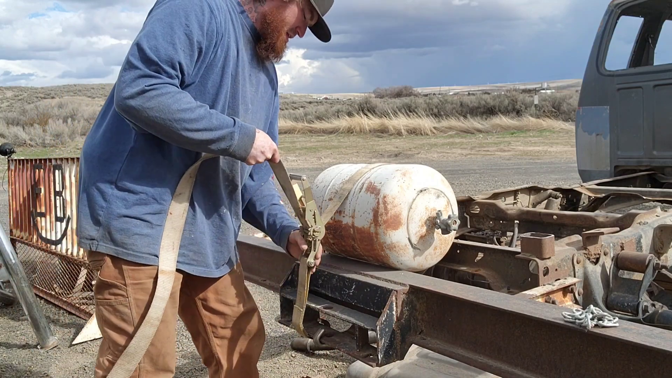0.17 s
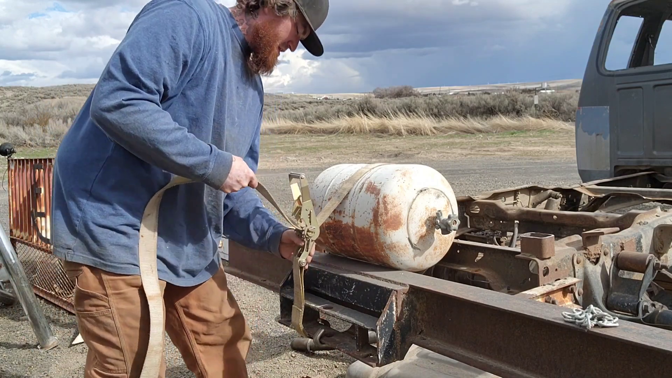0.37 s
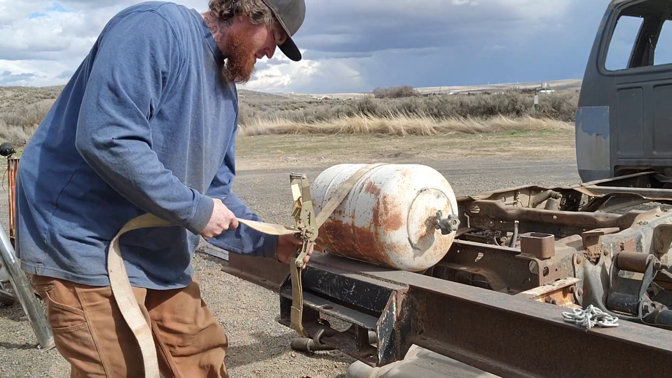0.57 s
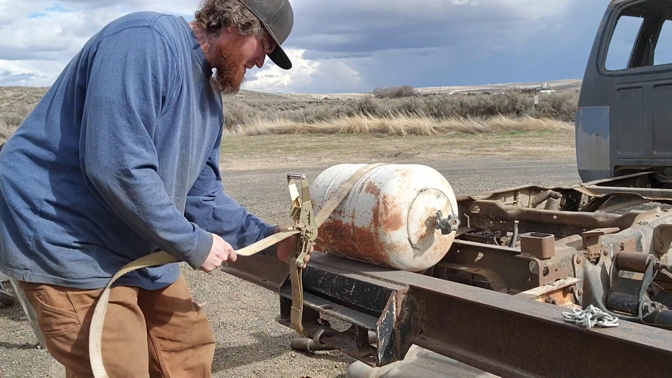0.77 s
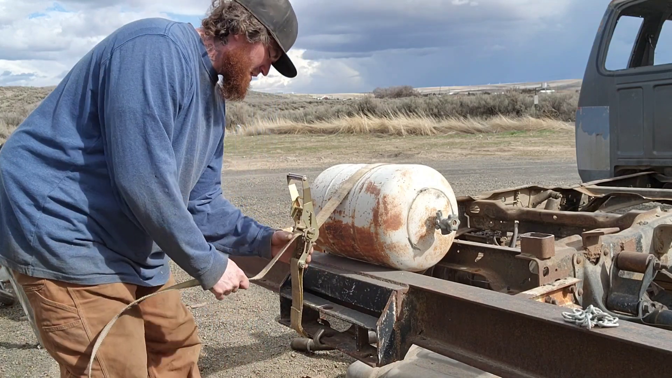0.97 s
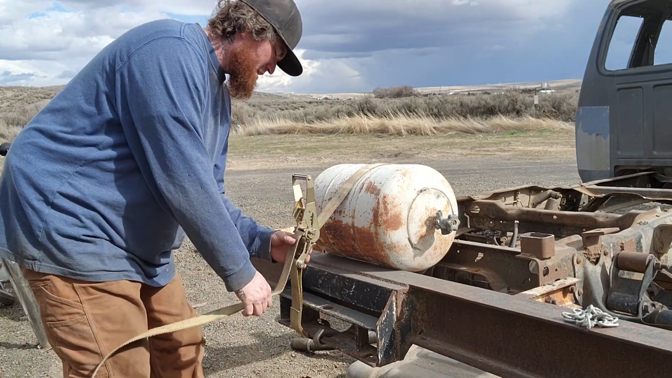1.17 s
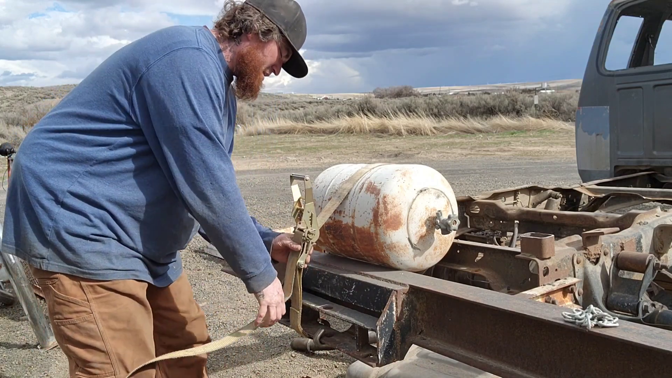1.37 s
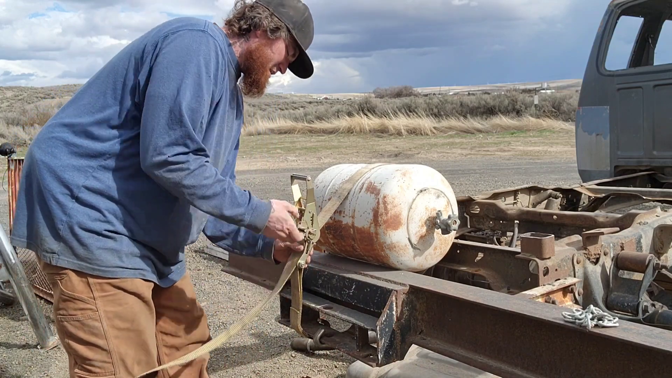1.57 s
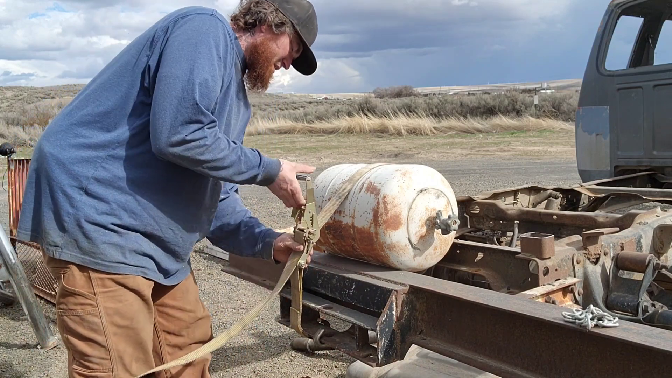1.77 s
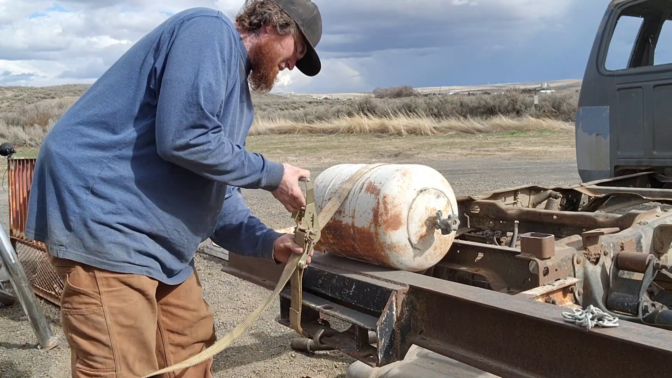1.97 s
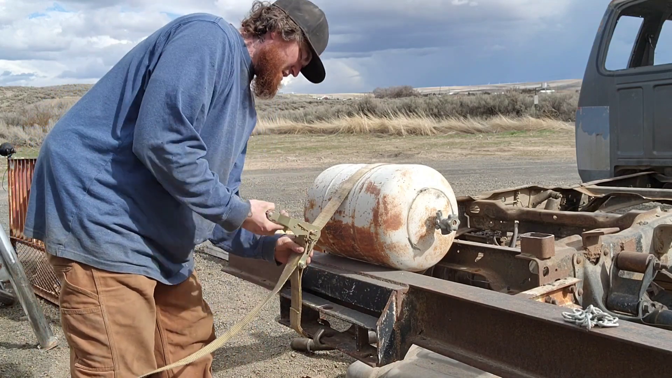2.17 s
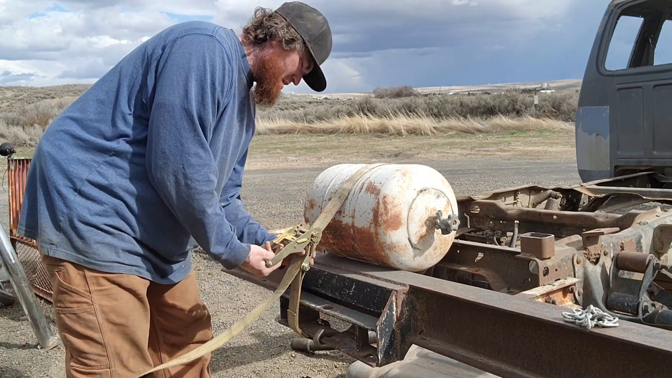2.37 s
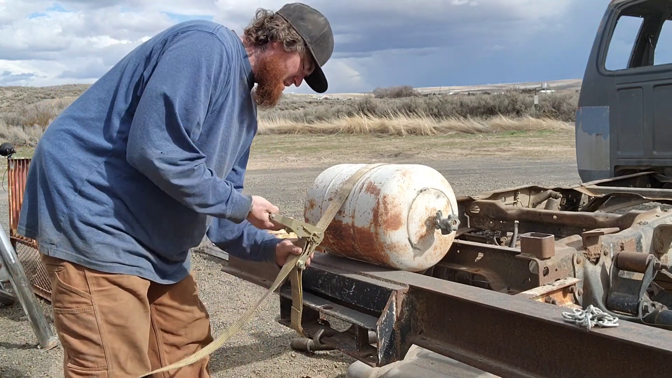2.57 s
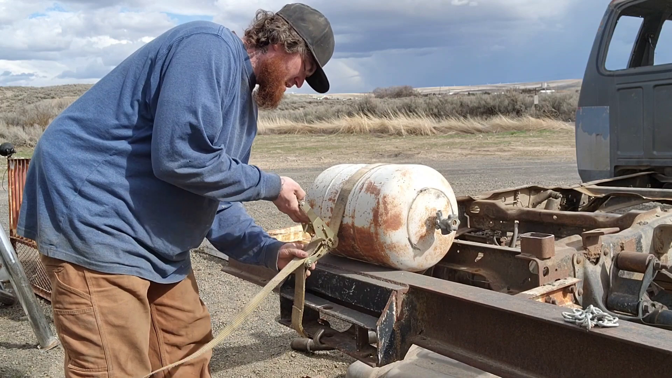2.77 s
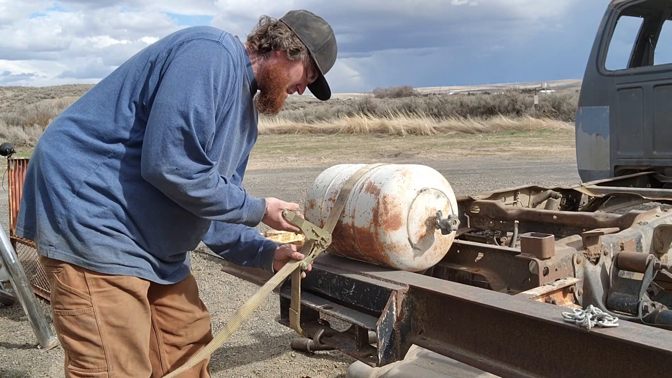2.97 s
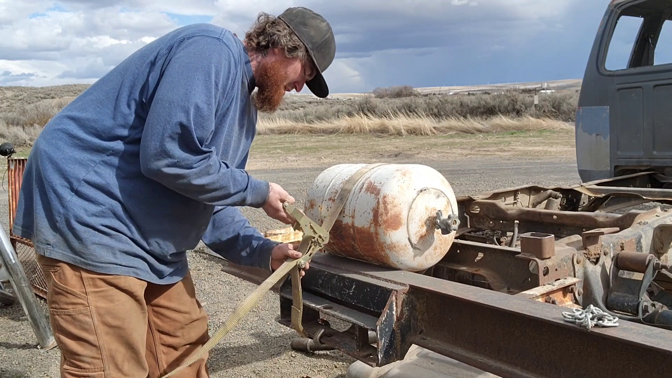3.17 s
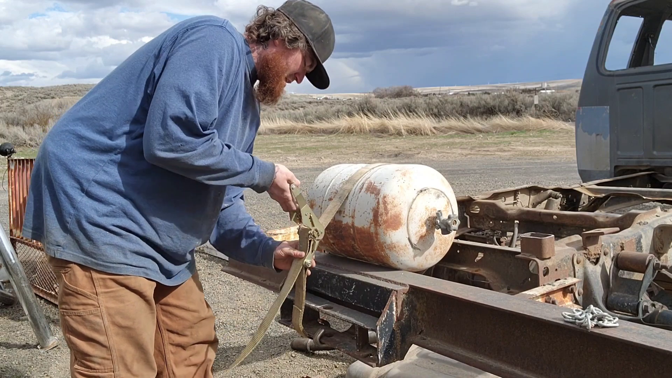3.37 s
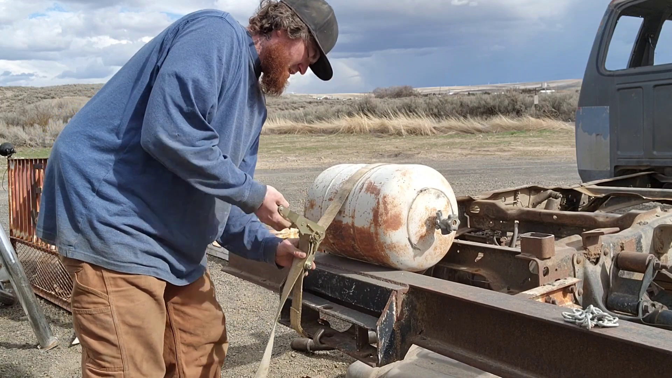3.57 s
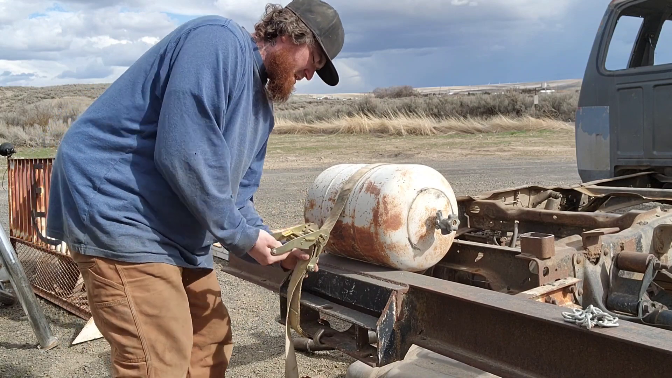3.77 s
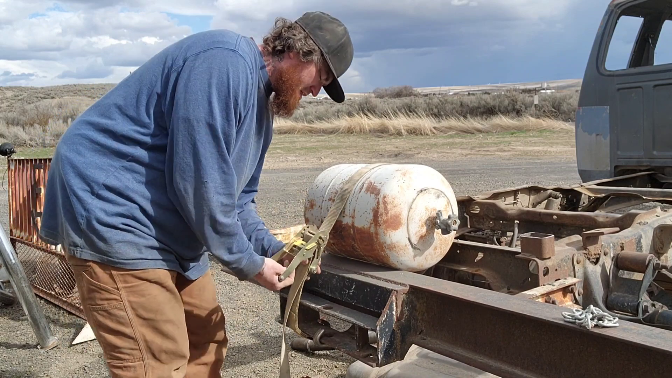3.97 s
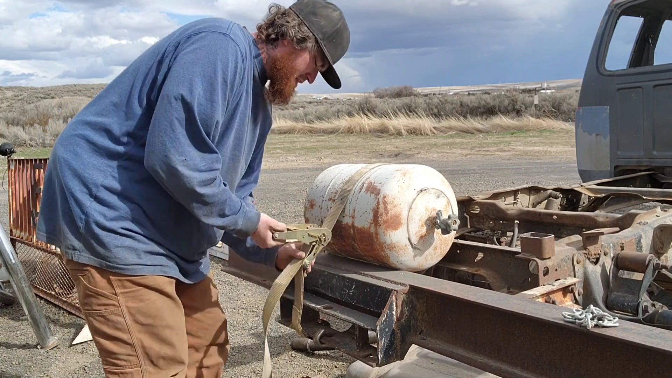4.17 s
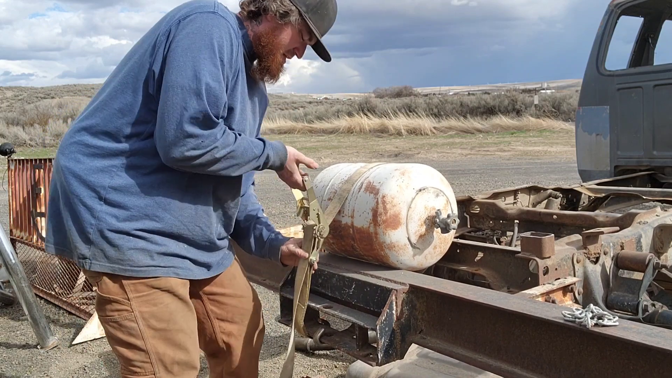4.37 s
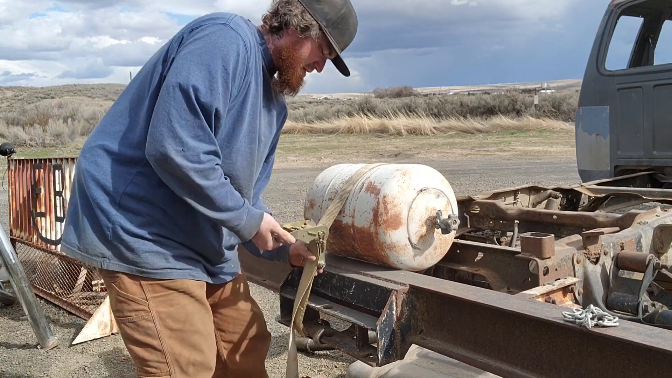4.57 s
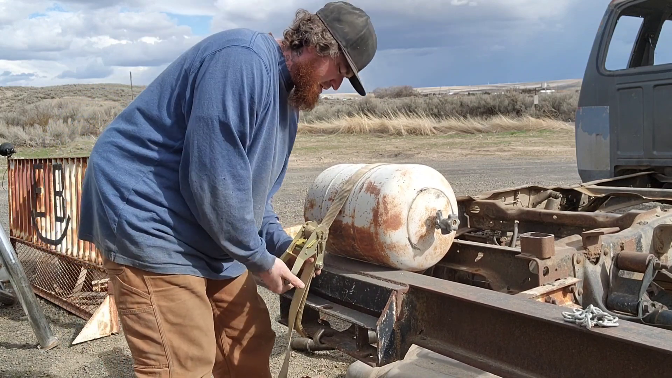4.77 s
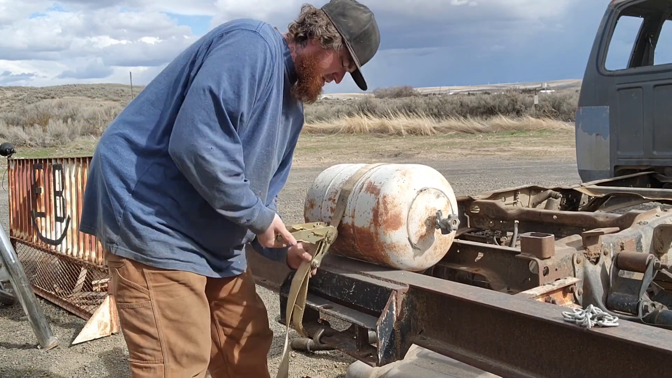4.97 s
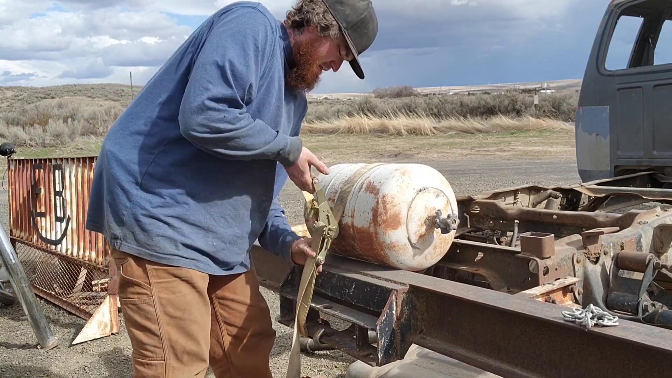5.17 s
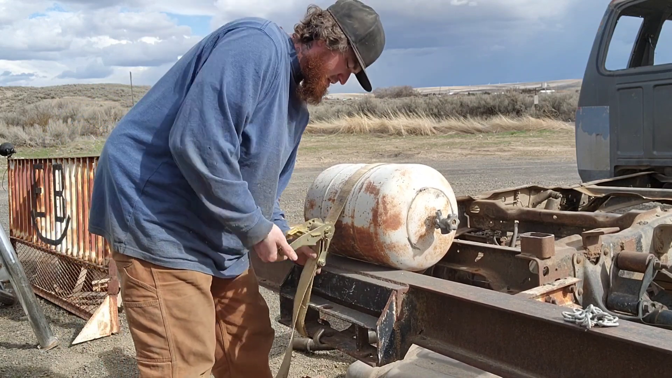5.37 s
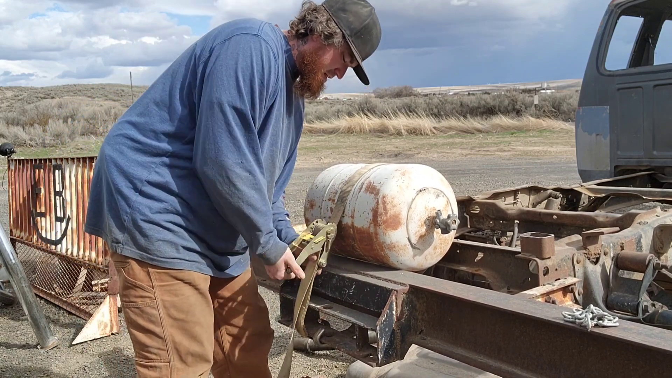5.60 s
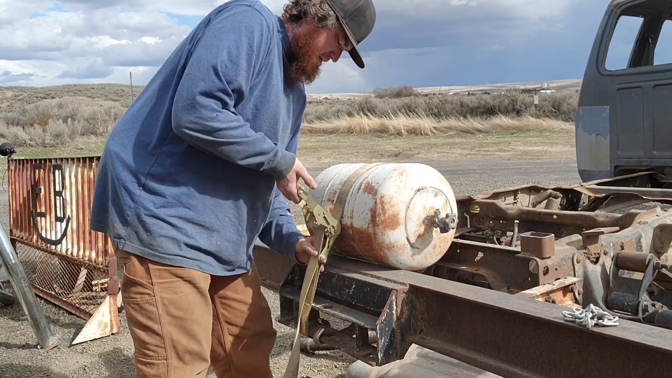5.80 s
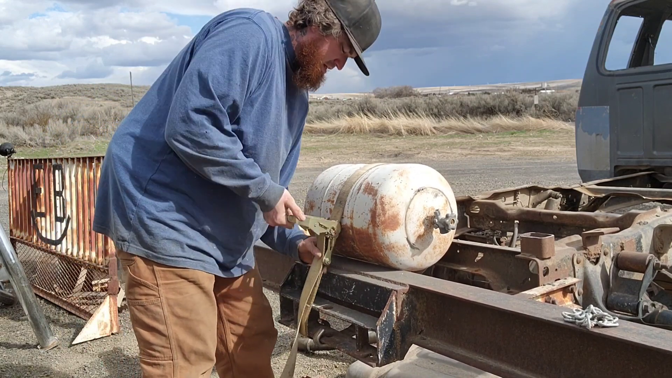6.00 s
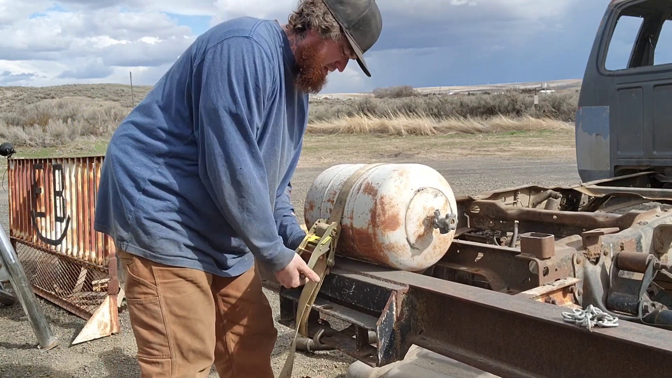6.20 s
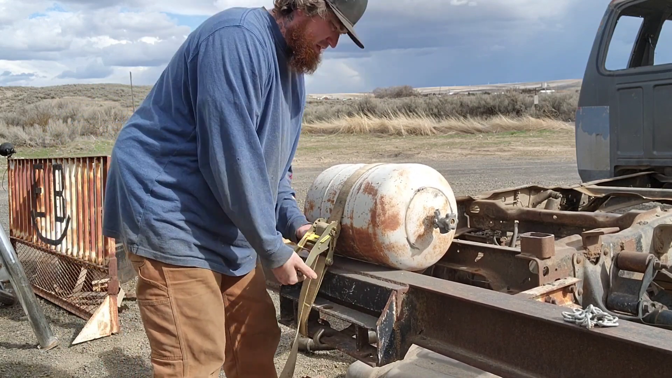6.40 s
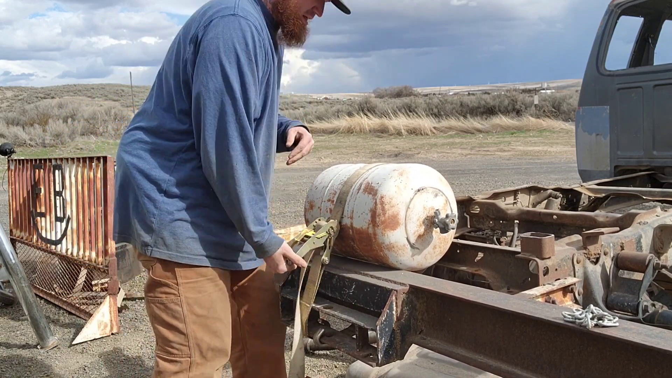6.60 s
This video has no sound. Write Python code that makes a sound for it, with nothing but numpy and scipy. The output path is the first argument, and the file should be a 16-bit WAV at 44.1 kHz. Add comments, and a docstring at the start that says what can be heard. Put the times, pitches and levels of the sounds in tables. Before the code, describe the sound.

Close metal ratchet snaps, sparse then rapid, with rattles, thumps on a tank, webbing hiss and squeaks over low wind rumble.

```python
"""Out in the open over a steel tank, close to two microphone ports: a webbing strap is ratcheted tight.
Wind rumble and faint air lie under it all; a scrape, scuffs and soft knocks on tank and beam come first,
shaped from noise and decaying modes. Near 1 s a faint pawl snap and the swish of the loose strap end follow.
Hard snaps start after 2 s and crowd from 3 to 6 s, each a blow with a rattle on ringing steel; the pivot,
a gliding tone, squeaks around 5 to 5.8 s. Webbing hisses in grains; scuffs and wind remain at the end."""
import sys
import numpy as np
from scipy import signal
from scipy.fft import rfft, irfft
from scipy.io import wavfile

SR = 44100
rng = np.random.default_rng(int(sys.argv[2]) if len(sys.argv) > 2 else 0)


def put_to_file(sound):
    """Save the sound as 16-bit audio at rate SR, in the file named by the first command-line argument."""
    columns = np.atleast_2d(sound).T  # one column per channel
    safe = np.clip(columns, -1, 1)
    whole_steps = np.round(safe * 32767)
    wavfile.write(sys.argv[1], SR, whole_steps.astype(np.int16))


N = 292824
HZ = np.maximum(np.fft.rfftfreq(N, 1 / SR), 1)
FRAME, EARLY = 2 ** 14, 2 ** 12   # samples for one blow, and before its snap
T_BLOW, HZ_BLOW = (np.arange(FRAME) - EARLY) / SR, np.fft.rfftfreq(FRAME, 1 / SR)


def from_db(db):
    """Gain of a level."""
    return 10 ** (np.asarray(db) / 20)


def rms_one(x):
    """Scaled to unit rms."""
    return x / np.sqrt(np.mean(x ** 2) + 1e-20)


def in_time(rows):
    """Columns joined by straight lines, one value a sample."""
    s, *columns = np.transpose(rows)
    return [np.interp(np.arange(N) / SR, s, column) for column in columns]


def at_hz(points, hz=HZ):
    """A (f/Hz, value) table read on a log-frequency axis."""
    point_hz, value = np.transpose(points)
    return np.interp(np.log(hz), np.log(point_hz), value)


def drift(rate_hz):
    """Slow random wander of rms 1, low-passed around rate_hz."""
    slow = irfft(rfft(rng.standard_normal(N)) / (1 + (HZ / rate_hz) ** 2), N)
    return rms_one(slow)


def grains(per_s, spread_db):
    """Sparse clicks of uneven size and either sign, in two channels; rms 1."""
    sizes = from_db(spread_db * np.minimum(rng.exponential(1, (2, N)), 4))
    signs = rng.choice([-1, 1], (2, N))
    present = rng.random((2, N)) < per_s / SR
    return rms_one(sizes * signs * present)


# likeness of left and right in diffuse sounds: (f/Hz, likeness from 0 to 1)
LIKENESS = [(60, 0.98), (180, 0.95), (550, 0.18), (1650, 0.38), (4970, 0.15), (15000, 0.25)]


def diffuse(pair, spectrum):
    """Two noises become left and right of the given colour and likeness; rms 1."""
    mid, side = rfft(pair)
    alike = np.clip(at_hz(LIKENESS), 0, 1)
    both = np.sqrt(1 + alike) * mid + np.sqrt(1 - alike) * side * [[1], [-1]]
    return rms_one(irfft(both * from_db(at_hz(spectrum)), N))


def body(modes, scatter_db, turn_per_khz):
    """Response at two ports to one blow: new strengths each time, each mode at its own phase per port."""
    hz, level_db, t60 = np.transpose(modes)[:, :, None]
    decay_per_s = np.log(1000) / t60
    resonance = SR / 2 / (decay_per_s + 2j * np.pi * (HZ_BLOW - hz))

    def struck():
        """Left and right spectra of one blow."""
        luck = rng.standard_normal((3, len(modes)))
        turn = np.minimum(turn_per_khz * hz.T / 1000, np.pi) * luck[1:]
        strength = from_db(level_db.T + scatter_db * luck[0])
        return (strength * np.exp(1j * turn) * -1j) @ resonance
    return struck


def near(centre_hz, fall_db_per_octave):
    """Level in dB, falling evenly per octave to both sides of a centre."""
    return -fall_db_per_octave * np.abs(np.log2((HZ_BLOW + 1) / centre_hz))


def add(out, s, spectrum):
    """One blow is laid into a track that starts early."""
    start = round(s * SR)
    out[:, start:start + FRAME] += irfft(spectrum, FRAME)


# wind strength: (t/s, level/dB)
GUSTS = [(0.0, -51), (3.55, -49.5), (4.46, -47), (6.64, -47)]
# colour of the wind rumble: (f/Hz, relative level/dB per Hz)
WIND = [(12, -25), (20, -7), (59, 2), (87, 0.5), (135, -7), (190, -6), (500, -32), (650, -62.5),
        (1100, -120)]
# colour of the open country: (f/Hz, relative level/dB per Hz)
AIR = [(180, -32.5), (300, 0), (942, -20), (2110, -13.5), (2960, -29.5), (7350, -23.5), (10000, -47),
       (13000, -77.5), (22000, -120)]


def weather():
    """Low wind rumble, wandering in level, over the faint wide noise of open country."""
    [wind_db] = in_time(GUSTS)
    wind = diffuse(rng.standard_normal((2, N)), WIND) * from_db(wind_db + 1.4 * drift(0.57))
    air = from_db(-68.5) * diffuse(rng.standard_normal((2, N)), AIR)
    return wind + air


# colour of the loose strap end: (f/Hz, relative level/dB per Hz)
BRUSH = [(2500, -40), (4000, -10), (5600, 0), (7000, -5), (9500, -28), (13000, -8), (16000, -18)]


def brush(start_s, length_s, level_db):
    """The loose strap end brushes past: one short swish of noise, quick to rise and slower to fade."""
    gone = np.clip((np.arange(N) / SR - start_s) / length_s, 0, 1)
    swish = np.sin(np.pi * np.sqrt(gone))
    return from_db(level_db) * swish * diffuse(rng.standard_normal((2, N)), BRUSH)


# movements of hands, strap and feet: (t/s, hold/s, webbing hiss level/dB, scuffing level/dB)
MOVES = [(0, 0.013, -60.5, -58.5), (0.2, 0.055, -64.5, -53.5), (0.548, 0.2, -65.5, -59),
         (0.698, 0.065, -51.5, -50), (0.735, 0.0077, -53, -47), (0.82, 0.015, -59, -69),
         (0.958, 0.041, -60, -63.5), (1.25, 0.18, -74.5, -73), (1.762, 0.1, -80.5, -67),
         (2.138, 0.045, -63, -74.5), (2.318, 0.074, -77, -70), (2.52, 0.014, -62, -65),
         (2.69, 0.015, -67, -79), (3.265, 0.032, -69, -55), (3.543, 0.026, -64, -62.5),
         (3.67, 0.065, -66, -58), (3.966, 0.037, -69.5, -57), (4.181, 0.13, -60, -59.5),
         (4.498, 0.14, -70, -53), (4.674, 0.023, -66, -71), (5.092, 0.09, -78.5, -59.5),
         (5.296, 0.091, -79, -59), (5.759, 0.014, -55.5, -49.5), (6.384, 0.13, -71.5, -59),
         (6.562, 0.082, -75.5, -58)]
SWELL_DB_PER_S, FADE_DB_PER_S = 217, 148
REST_HISS_DB, REST_SCUFF_DB = -77, -74   # floor beneath the movements


def strokes():
    """Each movement swells, holds and fades; hiss and scuffing levels in dB."""
    s, hold, *levels_db = np.transpose(MOVES)[:, :, None]
    t = np.arange(0, N + 64, 64) / SR
    swell_db = -SWELL_DB_PER_S * np.maximum(s - t, 0)
    fade_db = -FADE_DB_PER_S * np.maximum(t - s - hold, 0)
    tracks_db = []
    for db, rest_db in zip(levels_db, (REST_HISS_DB, REST_SCUFF_DB)):
        gain = from_db(rest_db) + from_db(db + swell_db + fade_db).max(axis=0)
        tracks_db.append(np.interp(np.arange(N) / SR, t, 20 * np.log10(gain)))
    return tracks_db


# colour of the hiss before it dulls with slowness: (f/Hz, relative level/dB per Hz)
WEBBING = [(1470, -36), (2500, -13), (3950, -3), (4880, -0.5), (6700, -3.5), (7590, 5), (9890, -21),
           (11500, -8), (13900, -9.5), (16000, -17.5)]
# colour of cloth and boots: (f/Hz, relative level/dB per Hz)
SCUFF = [(180, -39), (300, -2), (489, 0.5), (840, -3), (1450, -6), (2300, -11), (2800, -20.5), (5200, -56),
         (8800, -120)]


def handling(fast_db, brighten):
    """Webbing hisses through the slot, brighter the faster it runs; cloth and grit scuff in clumps."""
    hiss_db, scuff_db = strokes()
    hiss = diffuse(grains(4000, spread_db=1.8), WEBBING) * from_db(hiss_db + 2.0 * drift(30))
    top = irfft(rfft(hiss) * (1 - 1 / (1 + (HZ / 7000) ** 12)), N)
    # a quieter hiss stands for slower webbing and loses treble
    top_gain = from_db(brighten * np.minimum(hiss_db - fast_db, 0))
    hiss = hiss + top * (top_gain - 1)
    scuff = diffuse(grains(900, spread_db=1.0), SCUFF) * from_db(scuff_db + 2.5 * drift(30))
    return hiss + scuff


# frame scraping over loose iron: (t/s, length/s, level/dB, centre of the modes it wakes f/Hz)
SCRAPES = [(0, 0.042, -52, 510), (0.599, 0.13, -55, 990), (0.734, 0.092, -40.5, 1080),
           (3.187, 0.063, -46, 685), (3.283, 0.09, -48, 780), (3.953, 0.1, -49, 793),
           (4.443, 0.036, -39, 560), (4.975, 0.089, -41.5, 1700), (5.058, 0.03, -42, 675),
           (5.331, 0.12, -40.5, 2140), (5.608, 0.093, -50, 1790), (5.732, 0.063, -36, 1600),
           (5.778, 0.065, -39.5, 2150), (6.385, 0.053, -53.5, 1198)]
# modes of the loose iron, also sounded by knocks: (f/Hz, relative level/dB, t60/s)
CLATTER = [(510, -28, 0.015), (683, -18, 0.074), (804, -6.5, 0.016), (1120, -5.5, 0.022), (1450, -6, 0.054),
           (1810, -12.5, 0.018), (2350, -5.5, .025), (2310, -12.5, .025)]


def scraping(density, grit_db, scatter_db, fall_db_per_octave):
    """Dense uneven slips are heard as grit and drive the modes of the loose iron during each stroke."""
    iron = body(CLATTER, scatter_db=scatter_db, turn_per_khz=0.67)
    out = np.zeros((2, N + FRAME))
    for s, length, level_db, centre_hz in SCRAPES:
        slips = rng.standard_normal(FRAME) * (rng.random(FRAME) < density)
        stroke = np.sin(np.pi * np.sqrt(np.clip(T_BLOW / length, 0, 1)))
        gain = from_db(level_db + near(centre_hz, fall_db_per_octave))
        add(out, s, gain * rfft(stroke * slips) * (iron() + from_db(grit_db)))
    return out[:, EARLY:EARLY + N]


# long-ringing tank wall modes: (f/Hz, relative level/dB, t60/s)
WALL = [(678, 1, .28), (1513, -5, .11), (1570, -10, .26), (2870, -13, .25), (3350, -9, .28),
        (3660, -13, .22), (3780, -5, .06)]
# blows that reach the bare wall:
# (t/s, level/dB, centre of the modes they wake f/Hz, fall away from it/dB per octave)
RINGS = [(1.657, -55, 3750, 27), (2.018, -44.5, 1490, 28), (3.224, -44, 700, 9), (3.72, -56.5, 700, 7.5),
         (5.06, -41, 1400, 1), (5.74, -46.5, 1500, 5.5), (6.053, -43, 1800, 4.5), (6.155, -44.5, 1800, 4.5)]


def wall():
    """A few blows leave thin tones hanging in the tank wall."""
    struck = body(WALL, scatter_db=2.2, turn_per_khz=0.19)
    out = np.zeros((2, N + FRAME))
    for s, level_db, centre_hz, fall_db_per_octave in RINGS:
        gain = from_db(level_db + near(centre_hz, fall_db_per_octave))
        add(out, s, gain * rfft(T_BLOW == 0) * struck())
    return out[:, EARLY:EARLY + N]


# knocks on tank and beam: (t/s, clatter level/dB, beam boom level/dB, shell ring level/dB)
KNOCKS = [(0.731, -24, -48, -39.5), (0.764, -43, -39, -66), (0.887, -41, -67, -86),
          (1.104, -39.5, -70, -77), (1.199, -41, -61, -72), (1.431, -43, -50, -90), (1.809, -43, -74, -82),
          (2.386, -45, -73, -82), (3.223, -41, -37.5, -56), (3.278, -37, -32, -74.5),
          (3.305, -37, -45, -54.5), (3.949, -57, -40, -63.5), (3.987, -42, -55.5, -50.5),
          (4.259, -26.5, -37.5, -49), (4.448, -42, -37, -43), (4.479, -31, -34.5, -68),
          (5.045, -24.5, -35, -77), (5.766, -38, -33.5, -40.5), (5.827, -33, -79, -45.5),
          (6.052, -35.5, -49.5, -47), (6.156, -35, -41.5, -48), (6.471, -35, -64, -81)]
# modes of the beam: (f/Hz, relative level/dB, t60/s before the webbing damps them)
BEAM = [(164.7, -6, 0.27), (243, -3, 0.041), (278, -21.5, 0.38)]
# modes of the tank shell: (f/Hz, relative level/dB, t60/s before the webbing damps them)
SHELL = [(409, 4, .14), (424, -4, .08)]
# load shaken by a hard snap: clatter, beam boom, shell ring (level/dB relative to the snap level)
SHAKE_DB = (-33, -46.5, -63)
HARD_DB = -15   # snaps above this level shake the load
FULL_JUDDER_DB, SHORTER_PER_DB = -38, .25   # lighter knocks die faster: extra decay rate per dB under this
MUFFLING = 1.4   # the webbing damps the ring by this multiple of the extra decay


def tank(judder_db, judder_t60, soft_hz):
    """A soft blow with a ragged judder after it sets beam, shell and loose iron sounding."""
    parts = [body(modes, scatter_db=2.0, turn_per_khz=0.94) for modes in (CLATTER, BEAM, SHELL)]
    fading = from_db(-60 * np.maximum(T_BLOW, 0) / judder_t60)
    soft = 1 / (1 + 1j * HZ_BLOW / soft_hz) ** 3   # webbing cushions the contact
    out = np.zeros((2, N + FRAME))
    shakes = [(s, *np.add(db, SHAKE_DB)) for s, db, _ in CLICKS if db > HARD_DB]
    for s, *levels_db in KNOCKS + shakes:
        faster = 1 + SHORTER_PER_DB * max(FULL_JUDDER_DB - max(levels_db), 0)
        ragged = rng.standard_normal(FRAME) * (rng.random(FRAME) < .03)
        judder = from_db(judder_db) * fading ** faster * (T_BLOW > 0) * ragged
        force = (T_BLOW == 0) + judder
        response = sum(from_db(db) * part() for db, part in zip(levels_db, parts))
        sound = irfft(soft * rfft(force) * response, FRAME)
        add(out, s, rfft(sound * fading ** (MUFFLING * (faster - 1))))
    return out[:, EARLY:EARLY + N]


# squeaks of the handle pivot: (t/s, start f/Hz, end f/Hz, length/s, level/dB)
SQUEAKS = [(4.965, 2080, 2180, 0.039, -39.5), (5.333, 4630, 4700, 0.026, -30),
           (5.357, 3080, 2500, 0.067, -38), (5.068, 2120, 2005, .026, -32), (5.248, 1350, 1340, 0.038, -43),
           (5.632, 1450, 1546, 0.035, -46), (5.722, 1396, 1317, 0.046, -33),
           (5.748, 1305, 1664, 0.03, -36.5)]


def pivot(rough):
    """Steel slips on steel: a short gliding tone with an unsteady level."""
    out = np.zeros(N)
    for s, start_hz, end_hz, length, level_db in SQUEAKS:
        hz = np.linspace(start_hz, end_hz, round(length * SR))
        start = round(s * SR)
        swell = np.hanning(len(hz)) ** .5
        tone = np.sin(2 * np.pi * np.cumsum(hz) / SR)
        out[start:start + len(hz)] = from_db(level_db) * swell * tone
    return out * (1 + rough * drift(300))


# buckle contacts: (t/s, snap level/dB, rattle level/dB relative to the snap)
CLICKS = [(0.9128, -45, -23), (1.658, -48, -28), (1.667, -45, -45), (1.9125, -51, -18), (2.017, -32.5, -27),
          (2.2391, -17.5, -29), (2.259, -5.5, -24), (2.467, -35, -46), (2.485, -36, -22),
          (2.5503, -22.5, -19.5), (2.9628, -23, -30.5), (3.2122, -16.5, -11.5), (3.2192, -8.5, -15),
          (3.5032, -28, -25.5), (3.5452, -25, -35), (3.7061, -4.5, -18.5), (3.7131, -6, -18.5),
          (3.871, -6, -35), (3.88, -4, -18.5), (4.048, -30, -26), (4.209, -30, -10), (4.2171, -1, -21),
          (4.2571, -10.5, -13.5), (4.344, -57.5, -4.5), (4.4527, -40, -13.5), (4.4687, -42.5, -12),
          (4.4958, -17, -25), (4.511, -17, -22), (4.586, -51, -10), (4.6198, 2, -38.5), (4.6244, -4, -16),
          (4.6908, -56, 0), (4.7047, -6, -24.5), (4.711, -5, -19.5), (4.9295, -19.5, -34),
          (4.9376, -21.5, -23), (4.983, -22, -20), (5.0122, 0, -23.5), (5.0596, -4, -15), (5.251, -20, -15),
          (5.3395, -25, -10.5), (5.3559, -13, -15), (5.3628, -1, -17), (5.4355, 0, -17),
          (5.64, -22.5, -23.5), (5.723, -30, -4), (5.7375, 0.5, -24.5), (5.743, -23, -19.5),
          (5.7687, -41, 4.5), (5.8, -37, -7.5), (5.821, -37, -8), (5.9734, -25.5, -15.5),
          (6.0133, -51.5, 1), (6.0519, 3, -26.5), (6.15, -1.5, -37.5), (6.154, -9.5, -18.5),
          (6.3583, -52, -18)]
# buckle modes that stand out: (f/Hz, relative level/dB, t60/s)
BUCKLE = [(1360, -22, .04), (2085, -20, .04), (5680, -3, .04), (6400, -5, .035), (7090, -5, .03),
          (7430, -6, .03), (11430, -11, .03), (1540, -48, .25)]
# the many small buckle modes together: (f/Hz, relative level/dB per Hz)
SNAP = [(350, -53.5), (600, -29), (670, -31), (1230, -21), (1390, -19.5), (1660, -19), (2090, -14.5),
        (2680, -18.5), (3830, -11.5), (5630, -3.5), (7520, -6), (10000, -28), (11700, -20), (16000, -25.5)]
# the tighter strap ties buckle to tank and adds body: (t/s, change of low tilt/dB)
TENSION = [(3.2, -4), (4.0, 0), (6.2, -2.5)]
# weaker contacts are softer, so duller: tilt of a 0 dB snap (dB) and its change per dB of weakness
LOW_TILT_DB, LOW_GAIN_PER_DB = 6.5, 0.4604
HIGH_TILT_DB, HIGH_LOSS_PER_DB = 8.5, 0.3


def buckle(small_db, small_t60, ring_db, rattle_t60, tail_db, tail_t60, drag_db, drag_s,
           apart_hz, crack_db, burst_t60, linger_db):
    """Each pawl drags up its tooth, snaps in and rattles; the steel rings in clear and many small modes."""
    struck = body(np.add(BUCKLE, [0, ring_db, 0]), scatter_db=0.5, turn_per_khz=0.32)
    low = 1 / (1 + (HZ_BLOW / 2600) ** 6)
    high = 1 - 1 / (1 + (HZ_BLOW / 9600) ** 12)
    after, before = np.maximum(T_BLOW, 0), np.minimum(T_BLOW, 0)
    rattle = from_db(-60 * after / rattle_t60) * (after > 0)   # loose parts bounce
    drag = from_db(drag_db) * np.exp(before / drag_s) * (before < 0)
    tail = from_db(tail_db - 60 * after / tail_t60) * (after > 0)   # the frame behind shudders on
    # small modes, too dense to tell apart: the high ones burst, a weaker ring lingers
    since = np.arange(FRAME) / SR
    burst, linger = from_db(-60 * since / burst_t60), from_db(-60 * since / small_t60)
    colour = from_db(small_db + at_hz(SNAP, HZ_BLOW + 1))
    apart = 1 / np.sqrt(1 + (apart_hz / (HZ_BLOW + 1)) ** 2)   # the ports hear short waves differently
    out = np.zeros((2, N + FRAME))
    for s, snap_db, rattle_db in CLICKS:
        tension_db = np.interp(s, *np.transpose(TENSION))
        low_db = LOW_TILT_DB + tension_db - LOW_GAIN_PER_DB * snap_db
        high_db = HIGH_TILT_DB + HIGH_LOSS_PER_DB * snap_db
        tilt = from_db(low_db) * low + from_db(high_db) * high + 1 - low - high
        luck = rng.standard_normal((5, FRAME))
        chatter = luck[0] * luck[1] ** 3 / 2
        loose = rattle * chatter + drag * luck[0] * luck[1]
        force = rfft((T_BLOW == 0) + from_db(rattle_db) * loose)
        bursting, lingering = (1 - low) * rfft(luck[3:] * burst), rfft(luck[3:] * linger)
        mid, side = bursting + from_db(linger_db) * lingering
        crack = from_db(crack_db) * (1 - low)   # bright, leading the small modes
        small = colour * (crack + mid + apart * side * [[1], [-1]])
        sound = force * struck() + (force + rfft(tail * luck[2])) * small
        add(out, s, from_db(snap_db) * tilt * sound)
    return out[:, EARLY:EARLY + N]


def scene():
    """All sources together; the buckle sits a little to the right."""
    around = weather() + brush(start_s=0.96, length_s=0.13, level_db=-54.5)
    around = around + handling(fast_db=-53, brighten=0.29)
    scrapes = scraping(density=0.029, grit_db=27.5, scatter_db=2.5, fall_db_per_octave=15.0)
    knocks = tank(judder_db=-10.5, judder_t60=0.2, soft_hz=2500) + scrapes + wall()
    steel = buckle(small_db=-5, small_t60=0.06, ring_db=-24.0, rattle_t60=0.044, tail_db=-25.5,
                   tail_t60=0.11, drag_db=-15, drag_s=0.011, apart_hz=2500, crack_db=11.0,
                   burst_t60=0.0058, linger_db=-11)
    to_the_right = from_db([[-.7], [.7]])
    return around + knocks + (steel + pivot(rough=0.48)) * to_the_right


PEAK = .85   # peaks are rounded off above this level
CUTOFF_HZ = 15850


def record(dry):
    """The peaks are rounded off softly, then a steep low-pass cuts the top."""
    rounded = PEAK * np.tanh(dry / PEAK)
    low_pass = signal.ellip(14, .5, 90, CUTOFF_HZ, fs=SR, output="sos")
    return signal.sosfilt(low_pass, rounded)


dry = scene()
out = record(dry)
put_to_file(out)
```